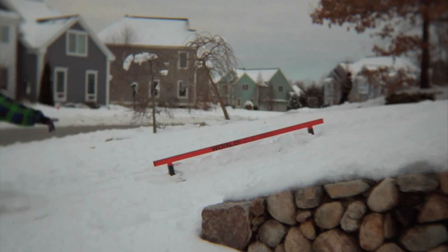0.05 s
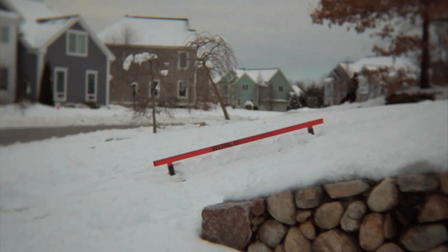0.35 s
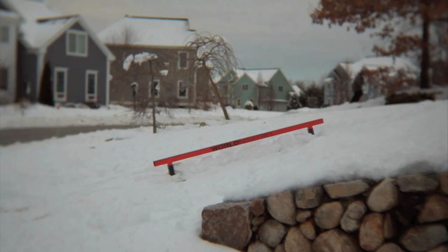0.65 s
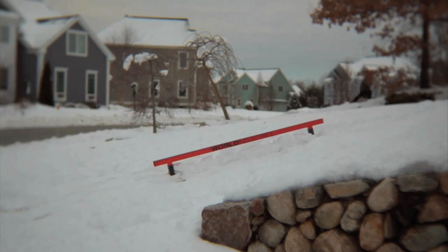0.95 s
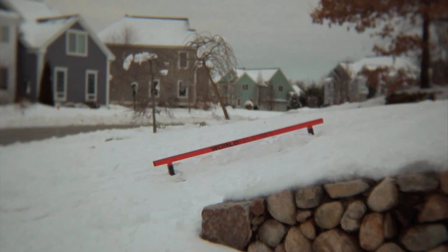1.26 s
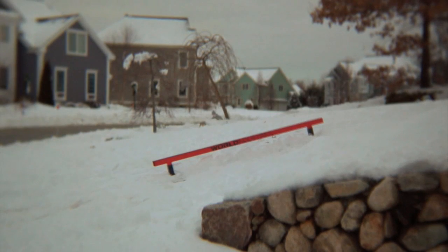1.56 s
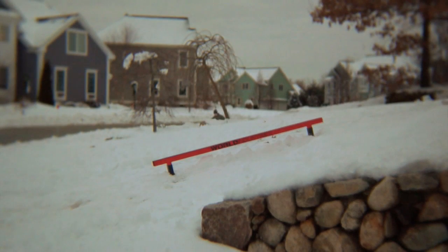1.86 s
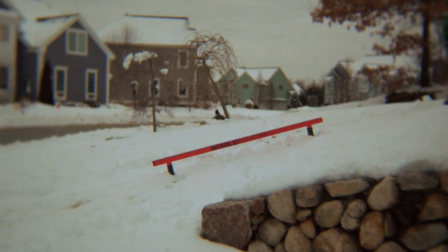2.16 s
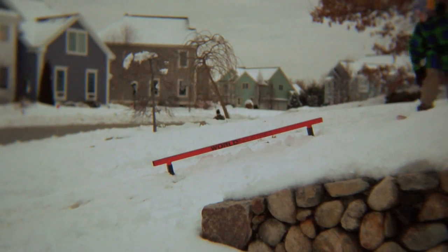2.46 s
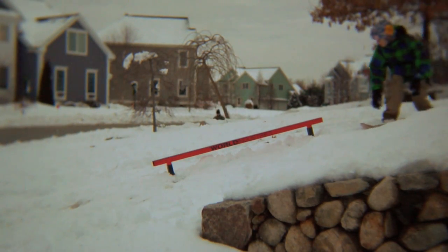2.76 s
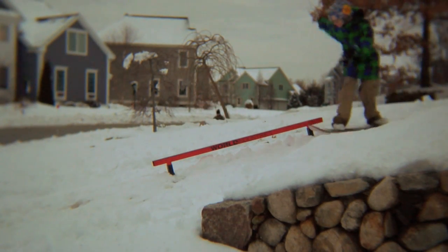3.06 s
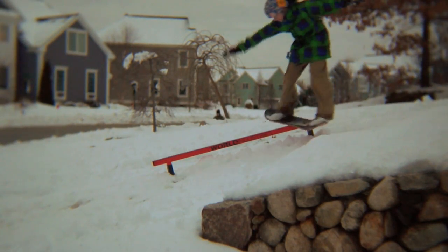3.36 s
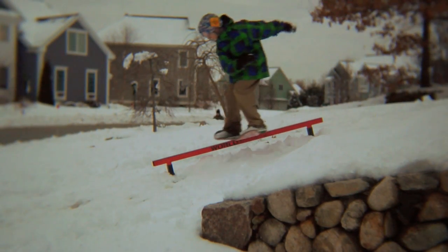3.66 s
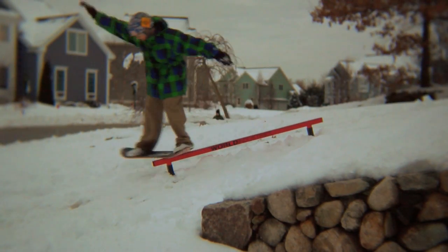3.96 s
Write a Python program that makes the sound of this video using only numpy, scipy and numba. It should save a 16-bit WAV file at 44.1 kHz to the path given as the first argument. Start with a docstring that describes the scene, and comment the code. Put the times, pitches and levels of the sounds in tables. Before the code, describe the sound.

A snowskate strikes and scrapes a steel rail outdoors. First it hisses and crunches away over snow, fading after 1 second. A low, motor-like hum and soft wind run throughout, the hum growing louder by 2 seconds. The board approaches from 2.2 seconds, pops up at 3.3 and lands with a loud, sharp knock at 3.4. It scrapes on until 4 seconds, with rising metallic ringing and a faint echo.

```python
"""Outdoors on snow, house fronts in earshot. A snowskate hisses away from the microphone over a low hum,
like a small motor right at the mic, and soft wind rumble. From about 1 to 2 s this bed dissolves into that
of a second run. The board rolls in, pops off the snow and at 3.4 s lands on a steel rail with a sharp
knock, after which the limiter ducks. It scrapes along the rail to the end, with a faint echo."""
import sys
import numpy as np
from scipy import signal
from scipy.fft import rfft, irfft
from scipy.io import wavfile
from numba import njit

SR = 44100
rng = np.random.default_rng(int(sys.argv[2]) if len(sys.argv) > 2 else 0)


def file_out(sig):
    """Save sig as 16-bit WAV at sys.argv[1]."""
    # one column per channel
    cols = np.atleast_2d(sig).T
    # limit, then scale
    lim = np.clip(cols, -1, 1)
    pcm = np.round(lim * 32767).astype(np.int16)
    wavfile.write(sys.argv[1], SR, pcm)


N = 176400

DISSOLVE_START_S, DISSOLVE_LENGTH_S = 1.05, 1
# Spectrum of ticking ice. Each row: frequency in Hz, relative level in dB.
ICE_SPECTRUM = [(2000, -27), (6000, -3), (9500, 17), (12500, 2), (15500, -12)]


def undb(db):
    """Decibels to gain."""
    return 10 ** (np.asarray(db) / 20)


def unit(x):
    """Scale to rms 1."""
    return x / np.sqrt(np.mean(x ** 2))


def clock():
    """Time of every sample in seconds."""
    return np.arange(N) / SR


def fader(rows, column=1):
    """Gain along a dB column of timed rows, silent outside them."""
    rows = np.array(rows)
    return undb(np.interp(clock(), rows[:, 0], rows[:, column], left=-np.inf, right=-np.inf))


def colour(x, spectrum):
    """Filter x through a curve of (Hz, dB) points and scale to rms 1."""
    hz, db = np.array(spectrum).T
    bin_hz = np.maximum(np.arange(N // 2 + 1) * SR / N, 1)
    gain = undb(np.interp(np.log(bin_hz), np.log(hz), db))
    return unit(irfft(rfft(x) * gain, N))


def noise(spectrum):
    """Coloured noise at rms 1."""
    return colour(rng.standard_normal(N), spectrum)


def wander(rate_hz):
    """Smooth random motion at rms 1."""
    bin_hz = np.arange(N // 2 + 1) * SR / N
    return unit(irfft(rfft(rng.standard_normal(N)) * np.exp(-(bin_hz / rate_hz) ** 2), N))


def grains(per_s, spread_db):
    """Dense random clicks of uneven size."""
    clicks = (rng.random(N) < per_s / SR) * rng.standard_normal(N)
    return unit(clicks * undb(spread_db * np.minimum(rng.exponential(size=N), 5)))


def burst(peak_s, decay_s, rise_s=1e-5):
    """Exponential rise to a peak, then exponential decay."""
    age = clock() - peak_s
    return np.exp(-np.minimum(np.abs(age) / np.where(age < 0, rise_s, decay_s), 60))


def ring(drive, modes):
    """Drive damped (Hz, dB, T60) sines; neighbours swing in opposite directions."""
    t = clock()[:SR]
    response = sum((-1) ** k * undb(db) * np.sin(2 * np.pi * hz * t) * np.exp(-np.log(1000) * t / t60)
                   for k, (hz, db, t60) in enumerate(modes))
    return signal.fftconvolve(drive, response)[:N]


def gliding_band(rows, half_width_hz):
    """A narrow noise band whose centre and level follow (s, Hz, dB) rows."""
    times, hz, _ = np.array(rows).T
    phase = 2 * np.pi * np.cumsum(np.interp(clock(), times, hz)) / SR
    band = wander(half_width_hz) * np.cos(phase) + wander(half_width_hz) * np.sin(phase)
    return band * fader(rows, column=2)


def hum(hz, level_db):
    """A steady, nearly pure hum, like a small motor at the microphone."""
    # Hum partials. Each row: harmonic number, relative level in dB.
    partials = [(1, 2), (2, -19), (3, -33), (4, -40)]
    phase = 2 * np.pi * hz * (clock() - DISSOLVE_START_S) + .03 * wander(5.2)
    tone = unit(sum(undb(db) * np.cos(round(k) * phase) for k, db in partials))
    return tone * undb(level_db + .35 * wander(11))


def wind_and_hum():
    """The first run's slowly fading wind and its hum dissolve, at equal power, into the second's."""
    # Air of each run, and the second's wind rumble. Each row: frequency in Hz, relative level in dB.
    first_air = [(20, -9), (50, -11), (120, 6.5), (180, 0.5), (280, 1.5), (380, -3), (570, -1), (800, -7),
                 (1080, -12.5), (1600, -24.5), (2400, -27), (3100, -28.5), (4500, -32.5), (15000, -43.5)]
    second_air = [(180, -38), (300, -3), (372, -7), (461, -4), (543, -8.5), (674, -6), (849, -10),
                  (1050, -14), (1260, -18), (1970, -27.5), (2740, -28), (3130, -22.5), (4570, -35),
                  (7140, -32.5), (15500, -45.5)]
    rumble = [(20, -2.5), (55, 1), (100, 5), (180, 7), (300, 0.5), (450, -35)]
    first = hum(hz=113, level_db=-30)
    first += noise(first_air) * undb(-31.5 - 1.83 * clock() + .4 * wander(16))
    second = hum(hz=122.95, level_db=-23.5) + noise(second_air) * undb(-45)
    second += noise(rumble) * undb(-42.5 + 1.1 * wander(21))
    share = np.clip((clock() - DISSOLVE_START_S) / DISSOLVE_LENGTH_S, 0, 1)
    return first * np.cos(share * np.pi / 2) + second * np.sin(share * np.pi / 2)


def house_echo(source):
    """The house fronts send a faint, diffuse tail back to the microphone, 22 ms late."""
    # Colour of the echo. Each row: frequency in Hz, relative level in dB.
    spectrum = [(200, -10), (3500, 2), (8000, 3), (15000, -30)]
    echo_db, t60_s = -30, .35
    tail = noise(spectrum) * burst(.022, t60_s / np.log(1000))
    tail /= np.sqrt(np.sum(tail ** 2))
    return undb(echo_db) * signal.fftconvolve(source, tail)[:N]


def deck_drum():
    """The deck drums in low swells as it rides over bumps."""
    # Bumps. Each row: centre in seconds, half length in seconds, level in dB.
    bumps = [(0.04, 0.13, -43), (0.836, .1, -39), (1.053, 0.11, -38.5), (2.942, 0.18, -40)]
    # Spectrum of the deck. Each row: frequency in Hz, relative level in dB.
    spectrum = [(120, -28), (200, -6.5), (290, -3), (360, -7), (520, -50)]
    swells = sum(undb(db) * np.exp(-((clock() - s) / half) ** 2) for s, half, db in bumps)
    return noise(spectrum) * swells


def crust():
    """Snow crust crunches, the tail pops off the snow and splinters of ice tick."""
    # Crunches, the last being the pop. Each row: start in seconds, level in dB, decay in seconds.
    crunches = [(.447, -50, .008), (.695, -55, .007), (.737, -46, .009), (.925, -43.5, 0.0055),
                (1.267, -45, 0.0033), (1.701, -60, .004), (2.997, -44, 0.0069), (3.2637, -33, 0.005)]
    # Spectrum of breaking crust. Each row: frequency in Hz, relative level in dB.
    spectrum = [(500, 1.5), (2500, -11), (3700, 1), (5200, -9), (7300, 2), (8400, -8.5), (15500, -20)]
    # Ice splinters. Each row: start in seconds, level in dB.
    splinters = [(.008, -46), (.305, -54), (.33, -50.5), (.444, -46.5), (0.666, -48), (1.01, -53),
                 (1.414, -55), (3.21, -53), (3.895, -54)]
    cracks = noise(spectrum) * sum(undb(db) * burst(s, decay) for s, db, decay in crunches)
    ticks = noise(ICE_SPECTRUM) * sum(undb(db) * burst(s, decay_s=.0067) for s, db in splinters)
    return cracks + ticks


def runner_on_snow():
    """The runner crushes grains, throws icy spray and makes the packed snow squeak."""
    # Spectra of crushed snow and fine spray. Each row: frequency in Hz, relative level in dB.
    crush_spectrum = [(200, -18), (600, -2.5), (1300, -0.5), (2000, 0), (2650, 2.5), (3000, 0), (3450, 5),
                      (4000, -4.5), (4700, -6.5), (5600, -11), (7200, -14), (8500, -32), (11000, -33),
                      (15500, -50)]
    spray_spectrum = [(3000, 1), (5000, 2.5), (6300, 9.5), (7600, 7.5), (8600, -5), (10000, -12),
                      (11500, -23), (15500, -31)]
    # Gliding away from the mic, then towards it. Each row: time in seconds, crush in dB, spray in dB.
    leaving = [(0, -40, -45), (.15, -46, -50.5), (.37, -45, -45.5), (.5, -49.5, -56), (.62, -45, -56.5),
               (.73, -41, -51.5), (.86, -48.5, -52.5), (.94, -41.5, -54), (1.02, -51.5, -56),
               (1.11, -58.5, -63), (1.4, -97, -86)]
    arriving = [(2.12, -69, -70), (2.19, -53.5, -55), (2.29, -64, -76), (2.62, -62, -59.5), (2.9, -55, -61),
                (3.0, -53, -51), (3.13, -52.5, -60), (3.21, -53, -56), (3.26, -52, -79), (3.3, -93, -85)]
    # Path of the squeak. Each row: time in seconds, centre in Hz, level in dB.
    squeak_path = [(0, 3400, -66), (.4, 3460, -47.5), (.6, 3390, -63), (.72, 3385, -47), (.82, 3640, -55),
                   (.9, 2950, -52), (.96, 3430, -55), (1.04, 3400, -62)]
    crush = colour(grains(per_s=4000, spread_db=-2), crush_spectrum) * (fader(leaving) + fader(arriving))
    ice = undb(-20.5) * colour(grains(per_s=400, spread_db=8), ICE_SPECTRUM)
    spray = (noise(spray_spectrum) + ice) * (fader(leaving, column=2) + fader(arriving, column=2))
    squeak = gliding_band(squeak_path, half_width_hz=750)
    return (crush + spray + squeak) * undb(wander(20))


def steel_rail(drive):
    """The rail rings on in its modes when struck or scraped."""
    # Rail modes. Each row: frequency in Hz, relative level in dB, T60 in seconds.
    modes = [(371, -4, .38), (395, -6, .3), (556, -8, .35), (603, -6, .27), (660, -8, .22), (891, -9, .25),
             (1319, -7.5, .2), (1602, 0, .27), (1675, 4, .18), (1950, -9, .16), (2140, -10, .18),
             (2582, -4, .2), (2661, -11, .25), (3106, -10, .12), (3970, -8, .09)]
    return ring(drive, modes)


def slide():
    """The runner catches and slips along the steel, keeps the rail ringing and sings in a rising band."""
    # Strength of the scrape. Each row: time in seconds, level in dB.
    levels = [(3.42, -23), (3.445, -34), (3.47, -42.5), (3.53, -47), (3.578, -37), (3.61, -41),
              (3.66, -43.5), (3.715, -41), (3.77, -46), (3.8, -46.5), (3.87, -45), (3.94, -43.5),
              (3.965, -53), (4.0, -39)]
    # The scrape, and what the edge feeds into the rail. Each row: frequency in Hz, relative level in dB.
    scrape_spectrum = [(200, -18), (500, 3), (900, 3.5), (1250, 5), (1480, 1), (1830, 6), (2200, 0),
                       (2600, 3), (3350, 2), (3900, -7.5), (4600, -10.5), (5300, -15), (7500, -16.5),
                       (15500, -39)]
    edge_spectrum = [(300, -6), (1200, -2), (1650, -10), (2200, -3), (2600, 7), (3100, 2), (4000, -8)]
    # Singing of the sliding board. Each row: time in seconds, centre in Hz, level in dB.
    sing_path = [(3.6, 2520, -58), (3.7, 2564, -45), (3.76, 2626, -51), (3.82, 2850, -47),
                 (3.89, 2880, -50), (3.934, 2930, -41), (3.965, 3044, -46), (4.0, 3300, -45)]
    catches = grains(per_s=3000, spread_db=.5)
    pressure = fader(levels) * undb(1.3 * wander(55))
    scrape = colour(catches, scrape_spectrum) * pressure
    rail = undb(-44.5) * steel_rail(colour(catches, edge_spectrum) * pressure)
    return scrape + rail + gliding_band(sing_path, half_width_hz=430)


def landing():
    """Each blow rings board and rail, duller when the contact is longer, with a rattle and a clang."""
    # Board meets rail. Each row: start in seconds, push in dB, contact length in seconds,
    # rattle level in dB, rattle rise and decay in seconds.
    blows = [(3.4044, -22, .00005, -23, .00014, .0023), (3.406, -2, .00002, -6, .0004, .003),
             (3.4085, -12, .0005, -16, .0005, .003), (3.4134, -10, .0009, -24, .0005, .003),
             (3.4448, -29, .0002, -31, .002, .004), (3.454, -28, .0003, -23, .007, .005),
             (3.4692, -23, .0005, -30, .0005, .0028)]
    # Board modes plus, from 6 kHz up, the brief bright overtones of the knock overloading the recorder.
    # Each row: frequency in Hz, relative level in dB, T60 in seconds.
    knock_partials = [(415, -10, .1), (790, -15, .035), (900, -5.5, .04), (1180, -8, .035),
                      (1320, -4, .032), (1700, -10, .04), (2000, -10, .03), (2640, -5.5, .02),
                      (2960, -8, .018), (3245, 3.5, .016), (3930, -13, .035), (6010, -9, .007),
                      (7000, -9, .008), (9500, -9, .006), (13200, -14, .006)]
    # The rattle, and the dense, quickly fading modes of the rail and its feet.
    # Each row: frequency in Hz, relative level in dB.
    rattle_spectrum = [(150, 3), (400, 8), (620, 6), (850, 2), (1300, 4), (2000, 3), (3200, 5), (4200, -3),
                       (5000, -6), (7000, -8), (8200, -17), (10000, -18), (15500, -37)]
    clang_spectrum = [(200, -21), (420, -5), (700, -9), (1250, -17), (2100, -14), (2700, 21), (3300, 5),
                      (4050, 17), (4600, -17), (7000, -24), (10000, -17), (15500, -34)]
    push, rattle_gain = np.zeros(N), np.zeros(N)
    for start, push_db, contact_s, rattle_db, rise_s, decay_s in blows:
        pulse = np.hanning(int(contact_s * SR) + 3)
        push[int(start * SR) + np.arange(len(pulse))] += undb(push_db) * pulse / pulse.sum()
        rattle_gain += undb(rattle_db) * burst(start, decay_s, rise_s)
    rattle = noise(rattle_spectrum) * rattle_gain
    clang = signal.fftconvolve(push, noise(clang_spectrum) * burst(0, decay_s=.023))[:N]
    knock = undb(1.5) * ring(push, knock_partials)
    return knock + undb(-22) * steel_rail(push) + undb(-20.5) * clang + rattle


def scene():
    """At one microphone: board on rail with its echo, over snow, wind and hum."""
    on_rail = landing() + slide()
    echo = house_echo(on_rail)
    on_snow = runner_on_snow() + deck_drum() + crust()
    return (on_rail + echo + on_snow + wind_and_hum())[None]


def record(dry):
    """The recorder's fast limiter catches the knock, the last peaks are rounded and the top is cut."""
    lookahead_s, attack_s, release_s = .0006, .00089, .045
    limit_db, ceiling, top_hz = -8, .68, 15800
    ahead = np.roll(np.abs(dry[0]), -int(lookahead_s * SR))
    peak = follow_peaks(ahead, 1 - np.exp(-1 / (attack_s * SR)), 1 - np.exp(-1 / (release_s * SR)))
    limited = dry / np.maximum(peak / undb(limit_db), 1)
    rounded = ceiling * np.tanh(limited / ceiling)
    return signal.sosfilt(signal.ellip(8, .2, 70, top_hz, fs=SR, output="sos"), rounded)


@njit
def follow_peaks(x, attack, release):
    """The limiter's detector: closes a share of the gap to x each sample."""
    out, level = np.empty(len(x)), 0.
    for i in range(len(x)):
        level += (x[i] - level) * (attack if x[i] > level else release)
        out[i] = level
    return out


dry = scene()
out = record(dry)
file_out(out)
```